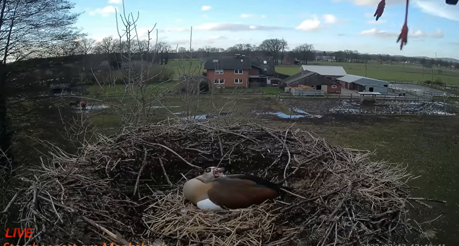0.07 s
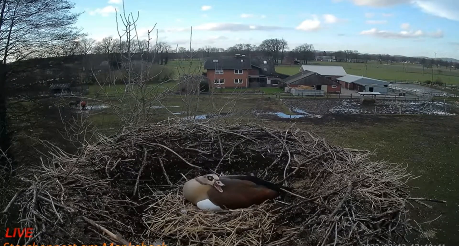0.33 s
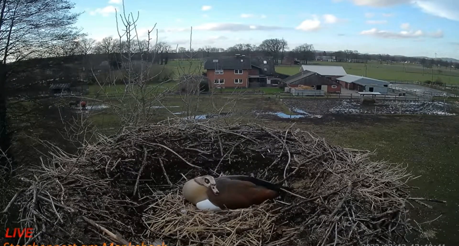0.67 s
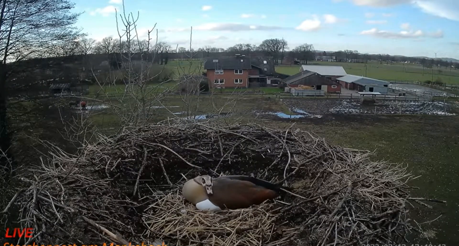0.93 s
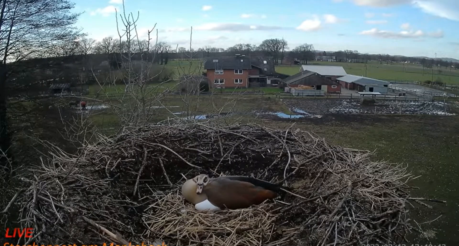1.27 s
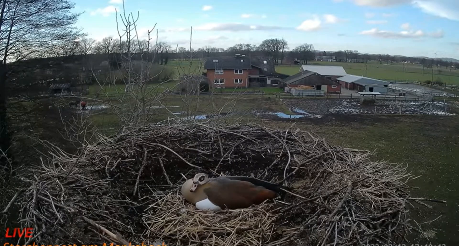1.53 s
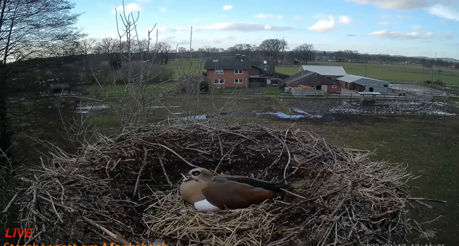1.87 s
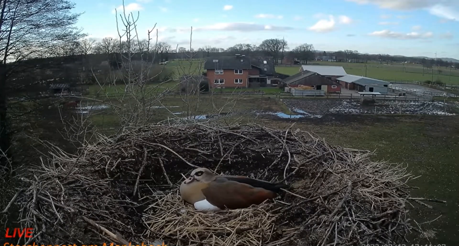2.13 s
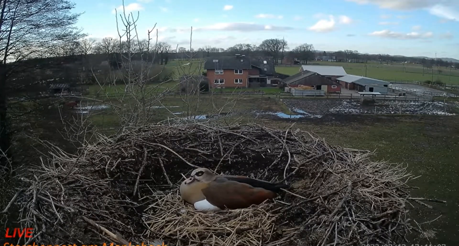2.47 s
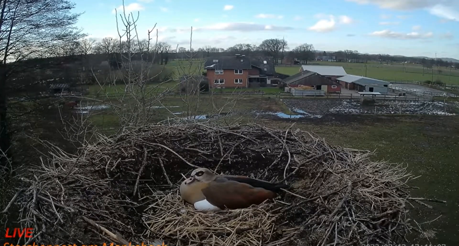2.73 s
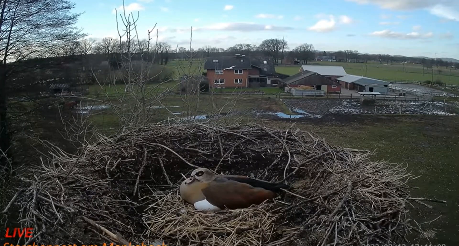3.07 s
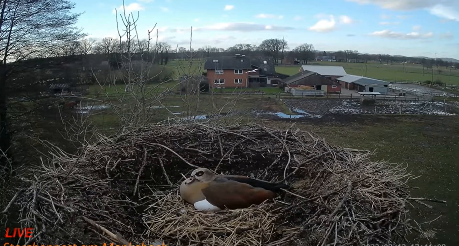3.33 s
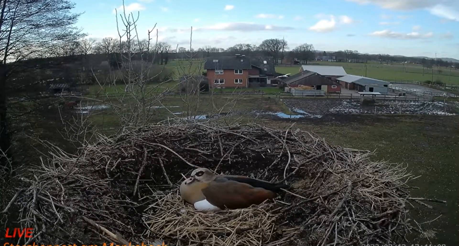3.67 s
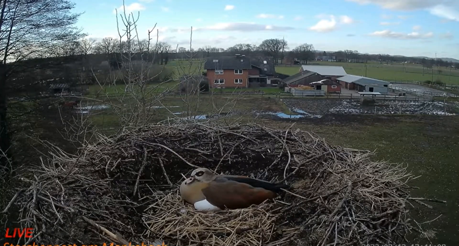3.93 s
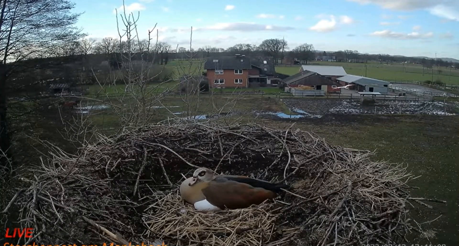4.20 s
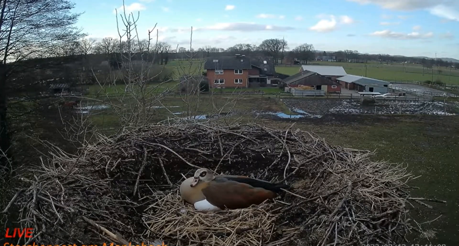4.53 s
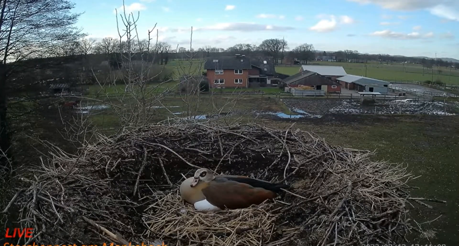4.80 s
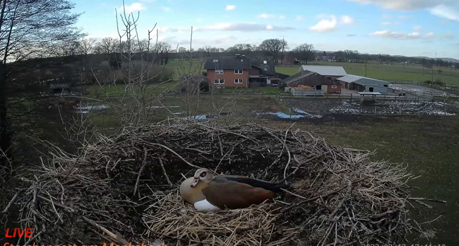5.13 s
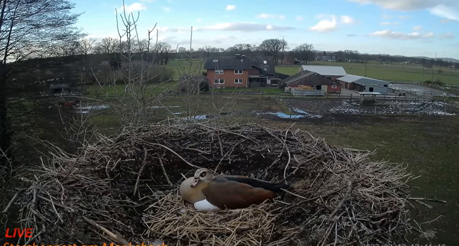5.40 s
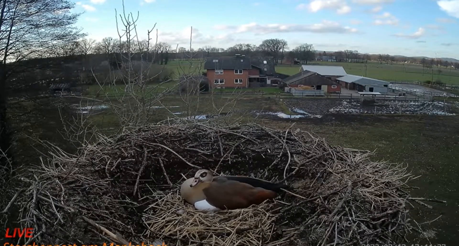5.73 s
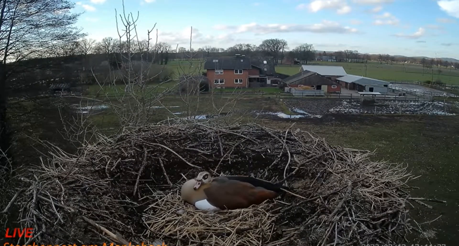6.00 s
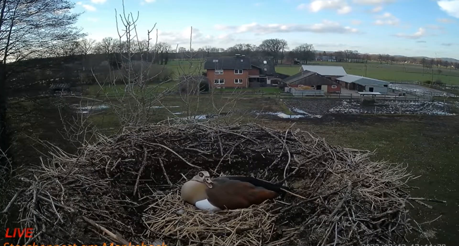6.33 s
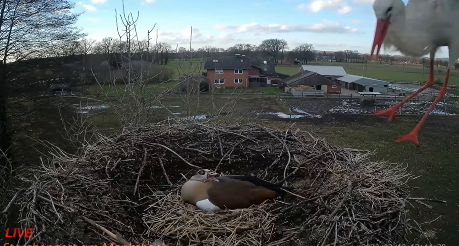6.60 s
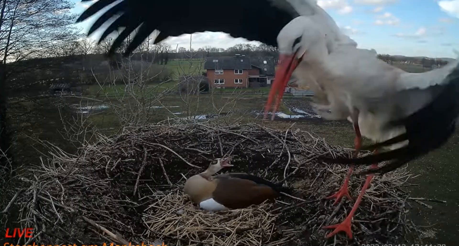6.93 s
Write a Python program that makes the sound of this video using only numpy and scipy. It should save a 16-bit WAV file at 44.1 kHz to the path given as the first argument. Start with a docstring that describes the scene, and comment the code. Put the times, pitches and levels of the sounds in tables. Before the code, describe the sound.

Rumbling gusts hit the microphone and cut out twice, before a stork's hollow bill claps, wing beats and twig scrapes.

```python
"""Wind gusts buffet the microphone of a camera above a stork's nest in open farmland; trees rustle faintly.
The sound drops out near 1.7 s, the gusts grow stronger, and it drops out again near 5.4 s.
The wind falls and a stork flies in, wheezing twice and clapping its bill, each clap with a hollow ring.
Near 7 s it lands: its wings push air at the microphone and its feet scrape and snap the twigs."""
import sys
import numpy as np
from scipy import signal
from scipy.fft import rfft, irfft, next_fast_len
from scipy.io import wavfile
from scipy.ndimage import uniform_filter1d, map_coordinates

SR = 44100
rng = np.random.default_rng(int(sys.argv[2]) if len(sys.argv) > 2 else 0)


def dump_mix(stems):
    """Bounce the given channels to the path in sys.argv[1] as a 16-bit WAV at rate SR."""
    frames = np.atleast_2d(stems).T  # one column per channel
    limited = np.clip(frames, -1, 1)  # hard clip at full scale
    pcm = np.round(limited * 32767).astype(np.int16)
    wavfile.write(sys.argv[1], SR, pcm)


N = 316197
TIME = np.arange(N) / SR
STRONG_DB = -12  # the level that counts as a strong wind

# Single eddies (swirls of air) that slap the microphone, the last ones from wing beats.
# Each row: time in seconds, relative level in dB, half width in milliseconds.
SLAPS = [(2.104, -5.5, 1.62), (2.3138, -10, 1.095), (2.3601, -3.5, 0.92), (2.3685, -3.5, 0.76),
         (3.3323, 2, 1.22), (3.3432, -1.5, 0.59), (3.8029, -11, 0.57), (3.998, -3, 0.75),
         (4.0718, -7.5, 0.54), (4.1529, -11, 0.56), (4.2642, -17, 0.51), (4.4212, -5, .66),
         (4.4642, -8.5, 0.7), (5.184, -21.5, 0.26), (6.572, -21.5, 14.7), (6.848, -9.5, 1.54),
         (6.905, -17, 13.4), (7.138, -19, 10.5)]
# The bright hiss of air and feathers. Each row: frequency in Hz, relative level in dB.
FIZZ = [(700, -4.5), (1300, -4.5), (2700, -2), (4300, -4.5), (6000, -1.5), (8300, 1.5), (11000, 0.5),
        (14500, 0), (16000, -25)]


def amp(db):
    """Turn decibels into a factor to multiply by."""
    return 10 ** (np.asarray(db) / 20)


def unit(x):
    """Scale a signal to an average power of 1."""
    return x / np.sqrt(np.mean(x ** 2) + 1e-20)


def wobble(per_s):
    """A smooth random curve that heads for a new value per_s times a second."""
    return map_coordinates(rng.standard_normal(4096), [TIME * per_s], mode="wrap")


def swell(start, length, attack_s, release_s):
    """A curve that rises to 1 at start, holds for length seconds, then fades."""
    return np.exp(-np.maximum(start - TIME, 0) / attack_s
                  - np.maximum(TIME - start - length, 0) / release_s)


def filtered(x, response):
    """Scale each frequency in x by response(hz)."""
    size = next_fast_len(len(x) + 8192)
    return irfft(rfft(x, size) * response(np.fft.rfftfreq(size, 1 / SR)), size)[:len(x)]


def noise(spectrum, size=N):
    """Noise of power 1, shaped by rows of frequency in Hz and relative level in dB."""
    row_hz, db = np.transpose(spectrum)
    white = rng.standard_normal(size)
    return unit(filtered(white, lambda hz: amp(np.interp(np.log(hz + 1), np.log(row_hz), db))))


def add(track, start, sound):
    """Mix a short sound into the track at start seconds."""
    part = track[max(round(start * SR), 0):][:len(sound)]
    part += sound[:len(part)]


def rustle():
    """Trees rustle; feathers and twigs grow louder as the stork glides near, and its wings swish."""
    # Rustling, coloured by the camera housing. Each row: frequency in Hz, relative level in dB.
    leaves = [(30, -19.5), (200, 11), (400, 4.5), (620, 1), (880, -10), (1230, -2), (1600, -17),
              (1980, -10.5), (2400, -17.5), (3100, -22.5), (4500, -30.5), (9000, -30), (16000, -20)]
    # Wing strokes. Each row: start in seconds, length in seconds, relative level in dB.
    strokes = [(0, .06, -58), (0.383, 0.06, -60), (0.549, 0.017, -57.5), (6.538, 0.04984, -57.5),
               (6.719, 0.1732, -59)]
    landing_s, glide_m_per_s, nest_distance_m = 6.97, 3.9, 0.83
    trees_db, feathers_db, brush_db = -59, -46, -51.5
    nearness = nest_distance_m / np.hypot(nest_distance_m, glide_m_per_s * (TIME - landing_s))
    swish = sum(amp(db) * swell(start, length, attack_s=0.0042, release_s=0.028)
                for start, length, db in strokes)
    body = np.sqrt(amp(trees_db) ** 2 + (amp(feathers_db) * nearness) ** 2 + (amp(13) * swish) ** 2)
    brush = np.hypot(amp(brush_db) * nearness ** 1.62, swish)
    sway_db = 1.3 * wobble(30)
    return amp(sway_db) * (body * noise(leaves) + brush * amp(2 * sway_db) * noise(FIZZ))


def airflow():
    """Breeze, gusts and wing beats add up to a wind level and a brightness: more wind, finer eddies."""
    # The wind between gusts. Each row: time in seconds, level in dB.
    breeze = [(0, -51), (0.85, -44.5), (1.15, -49), (1.7, -44.5), (1.87, -27), (2.4, -27), (2.62, -33),
              (3.0, -22), (3.72, -22), (3.88, -15.5), (5.39, -15), (5.52, -45), (5.88, -53), (6.65, -43.5),
              (7.16, -32.5)]
    # Gusts. Each row: start in seconds, length in seconds, level in dB, eddy fineness as a ratio.
    gusts = [(0, 0.25, -16.5, 1.503), (0.274, 0.069, -22, 1.81), (.35, 0.027, -36, 2.8),
             (0.539, 0.061, -16.5, 1.506), (0.633, .1, -21, 1.43), (0.969, .015, -41, 1.53),
             (1.229, 0.038, -42, 1.18), (1.9, .07, -20.5, .7), (2.104, 0.059, -21, 0.71),
             (2.311, .07, -16, 0.99), (2.845, 0.038, -23, .6), (3.098, .15, -15.5, 1.007),
             (3.319, .04, -18.5, 0.792), (3.531, 0.085, -18, .65), (3.787, 0.0492, -15.5, .92),
             (3.98, .16, -12, 1.1), (4.283, 0.0601, -15.5, 1.345), (4.431, 0.047, -12, 0.99),
             (4.578, 0.046, -17, 0.94), (4.794, .05, -17, 0.96), (5.189, 0.18, -12, .92)]
    # Air that the wings push at the microphone. Each row reads like a gust.
    downwash = [(5.588, 0.012, -37.5, 1.133), (5.645, .025, -32, 1.5), (6.196, 0.057, -42, 0.966),
                (6.624, 0.014, -37, 1.3), (6.747, 0.013, -28.5, 1.4), (6.812, 0.024, -24, 1.1)]
    calm_hz, strong_hz = 48.22, 318.2
    power = amp(np.interp(TIME, *np.transpose(breeze))) ** 2
    fine_power = power.copy()
    for start, length, db, fineness in gusts + downwash:
        gust = (amp(db) * swell(start, length, attack_s=0.022, release_s=0.028)) ** 2
        power += gust
        fine_power += fineness * gust
    level_db = 10 * np.log10(power)
    brightness_hz = calm_hz + (strong_hz - calm_hz) * amp(level_db - STRONG_DB) ** 1.08
    return level_db, brightness_hz * fine_power / power * amp(wobble(25))


def eddy(u, lean=0):
    """A passing eddy pushes, then sucks; lean sharpens the push. u is time in half widths."""
    return (lean * (1 - u ** 2) - u) * np.exp((1 - u ** 2) / 2)


def eddy_train(brightness_hz):
    """Eddies arrive at an uneven pace: faster air makes them narrower and more frequent."""
    speed = np.maximum(brightness_hz, 30) / 400
    count_so_far = np.cumsum(185 * speed ** 0.4) / SR
    chance = rng.standard_normal((1600, 4))  # for each eddy: timing, width, size, skew
    due = np.arange(len(chance)) + 0.249 * chance[:, 0]
    centres = np.searchsorted(count_so_far, due[due < count_so_far[-1]])
    _, width, size, skew = chance[:len(centres)].T
    half_s = 0.00053 * speed[centres] ** -0.74 * np.exp(0.67 * abs(width))
    lean = 0.28 + 0.36 * skew
    offsets = np.arange(-700, 701)  # samples around each centre
    pulses = amp(5.5 * size)[:, None] * eddy(offsets / SR / half_s[:, None], lean[:, None])
    pulses *= np.hanning(len(offsets))
    # add up the pulses; two spare slots catch whatever falls off the ends
    slots = np.clip(centres[:, None] + offsets + 1, 0, N + 1)
    return np.bincount(slots.ravel(), pulses.ravel(), N + 2)[1:N + 1]


def buffeting(level_db, brightness_hz):
    """Rough air beats on the microphone's opening: separate eddies ride on a deep rumble."""
    # The rumble of the wind. Each row: frequency in Hz, relative level in dB.
    rumble = [(8, 16.5), (25, -12), (55, 5), (90, 4.5), (150, -6), (220, -25.5), (400, -28.5), (900, -89)]
    eddies = unit(eddy_train(brightness_hz)) + noise(rumble)
    # each gust keeps its strength while the eddies within it come and go
    strength = np.sqrt(abs(uniform_filter1d(eddies ** 2, size=1800)) + 0.055)
    eddies /= uniform_filter1d(strength, size=400)
    pressure = amp(level_db + 0.9 * wobble(30)) * eddies
    # the opening rounds off the tallest eddies and smooths away the narrowest
    rounded = 0.66 * np.tanh(pressure / 0.52)
    pressure = filtered(rounded, lambda hz: (1 + (hz / 650) ** 12) ** -0.5)
    for when, db, half_ms in SLAPS:
        u = (TIME - when) / (half_ms / 1000)
        near = abs(u) < 18
        pressure[near] *= 1 - np.exp(-(u[near] / 1.73) ** 2)  # a slap shoves the other air aside
        pressure[near] += amp(db - 5) * eddy(u[near])
    return pressure


def hiss(pressure, level_db):
    """Fine hiss spits with every swing of pressure, most on the pushes and in strong wind."""
    swing = abs(signal.hilbert(pressure)) + np.maximum(pressure, 0)
    usual_swing = abs(uniform_filter1d(swing, size=4000)) + 1e-6
    spits = 0.037 + swing / usual_swing
    hiss_db = -55 + 0.55 * (level_db - STRONG_DB)
    flicker_db = 2.2 * wobble(50) + 2.5 * wobble(700)
    return amp(hiss_db + flicker_db) * unit(spits) * noise(FIZZ)


def wake():
    """Each slap leaves a short, hissing trail of stirred-up air."""
    trail = sum(amp(db) * swell(when, 0, attack_s=half_ms / 1000, release_s=0.052)
                for when, db, half_ms in SLAPS)
    trail *= amp(-55 + 3 * wobble(500))
    return trail * noise([(800, 7.5), (2500, 1.5), (5000, -4), (9000, 0.5), (15000, -1)])


def twigs():
    """Dry twigs give way in short rasps under the landing bird."""
    # Scrapes and snaps of the feet. Each row: start in seconds, level in dB, length in seconds.
    snaps = [(6.646, -29.5, 0.0034), (6.868, -26.5, 0.012), (6.903, -32, 0.0076), (6.986, -40, .003)]
    track = np.zeros(N)
    rasp = noise([(200, 21), (600, 8), (2500, 4.5), (5000, -5.5), (9000, -4.5), (16000, -19)])
    rasp *= amp(0.9 * wobble(810))
    for start, db, length in snaps:
        track += amp(db) * rasp * np.exp(-(2 * (TIME - start) / length - 1) ** 4)
    return track


def wheezes():
    """Two thin, rough calls: a few unsteady tones that bend as they swell and fade."""
    # Each row is one tone: middle in seconds, level in dB, half length in seconds, pitch in Hz.
    tones = [(5.794, -56, 0.05, 1460), (5.807, -64, 0.043, 3900), (5.808, -65, 0.014, 7440),
             (6.433, -45.5, 0.012, 1812), (6.44, -48, 0.021, 2740), (6.441, -39.5, 0.0081, 3450),
             (6.43, -54.5, 0.014, 5260), (6.432, -51, 0.02, 8260)]
    track = np.zeros(N)
    for middle, db, half_s, hz in tones:
        u = (TIME - middle) / half_s
        loudness = (abs(u) < 5) / (1 + u ** 2)
        pitch_hz = hz * (0.98 + 0.02 * loudness) + 90 * wobble(700)
        track += loudness * amp(db + 3.2 * wobble(300)) * np.sin(2 * np.pi * np.cumsum(pitch_hz) / SR)
    return track


def ring(tones, t, tuning=1):
    """A struck object rings with fading tones, at slightly new strengths for every blow."""
    return sum(amp(db + rng.normal(0, 0.67) - 60 * t / fade_s) * np.sin(2 * np.pi * hz * tuning * t)
               for hz, db, fade_s in tones)


def bill_claps():
    """The halves of the bill touch, then slam shut with a sharp snap; a hollow ring sounds along with each
    clap."""
    # Claps. Each row: time in seconds, relative level in dB, ring tuning in Hz, snap strength in dB.
    claps = [(5.5566, -24.5, 1310, -5.5), (5.5835, -35, 1221, -6), (5.7046, -20.5, 1326, -5),
             (5.717, -28.5, 1280, -7.5), (5.7614, -40, 1384, -14), (5.8512, -25.5, 1254, -4),
             (5.8666, -20.5, 1314, -7), (5.9804, -23.5, 1210, -5.5), (6.0237, -16.5, 1460, -4),
             (6.1071, -20.5, 1230, -0.5), (6.178, -14.5, 1320, 3), (6.2375, -19.5, 1250, -3),
             (6.3385, -14.5, 1339, 3), (6.3635, -18, 1222, -8), (6.4964, -17, 1207, -7),
             (6.6229, -15.5, 1179, -10), (6.7438, -12.5, 1172, -8.5)]
    # A hollow ring that sounds along with each clap, its pitch shifting from clap to clap. Each row: pitch in
    # Hz before the shift, relative level in dB, seconds to fade by 60 dB.
    hollow_tones = [(426, -7.5, 0.051), (611, 1, 0.031), (1278, 4, 0.023), (1447, -12, 0.035)]
    # The two hard halves of the bill, and the camera housing that rings along.
    # Each row: pitch in Hz, relative level in dB, seconds to fade by 60 dB.
    bill = [(2217, 4, 0.018), (2844, 10, 0.0095), (3550, -14, 0.0053)]
    housing = [(1981, -3.5, 0.04), (3080, -21.5, 0.052)]
    # The dry crack of a clap. Each row: frequency in Hz, relative level in dB.
    crack_spectrum = [(200, -52), (450, 15.5), (720, 2.5), (940, -16), (1300, 6.5), (3100, 2.5),
                      (4300, -9.5), (6000, -16.5), (8300, -14), (12000, -27), (16000, -26.5)]
    track, t = np.zeros(N), np.arange(SR // 8) / SR
    # the crack dies at once; the nest scatters a faint tail of it
    crack_fade = amp(6.5 - 60 * t / 0.018) + amp(-33 - 60 * t / 0.58)
    for when, db, hollow_hz, snap_db in claps:
        crack = noise(crack_spectrum, size=len(t)) * crack_fade
        ringing = ring(hollow_tones, t, tuning=hollow_hz / 1260) + ring(housing, t)
        snap = amp(snap_db) * (ring(bill, t) + crack)
        blow = (ringing + snap) * (1 - np.exp(-t / 0.00032))
        blow = amp(db + 1.5) * blow / abs(blow).max()
        add(track, when - 0.0011, amp(-12.5) * blow)  # the light touch
        add(track, when + 0.0005, blow)  # the slam
    return track


def scene():
    """Wind on the microphone and the stork close by, in one channel."""
    level_db, brightness_hz = airflow()
    pressure = buffeting(level_db, brightness_hz)
    wind = pressure + hiss(pressure, level_db) + wake()
    return (wind + rustle() + bill_claps() + twigs() + wheezes())[None]


def record(dry):
    """The camera's sound cuts out twice, dips briefly twice and loses its highest treble."""
    # Gaps and dips. Each row: start in seconds, end in seconds, change of level in dB.
    dropouts = [(1.695, 1.859, -90), (5.394, 5.517, -90), (6.913, 6.928, -13), (7.077, 7.121, -6)]
    top_hz = 15850
    gain = np.ones(N)
    for start, end, depth_db in dropouts:
        gain[(TIME > start) & (TIME < end)] = amp(depth_db)
    interrupted = dry[0] * uniform_filter1d(gain, size=14)
    return filtered(interrupted, lambda hz: hz < top_hz)[None]


dry = scene()
out = record(dry)
dump_mix(out)
```